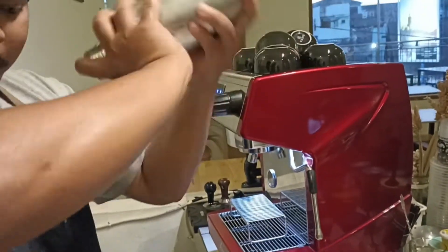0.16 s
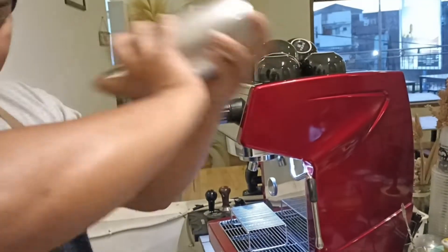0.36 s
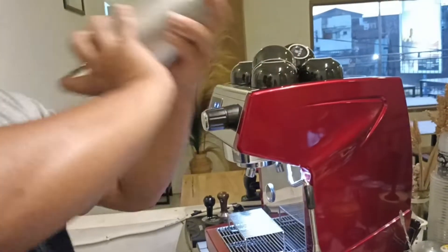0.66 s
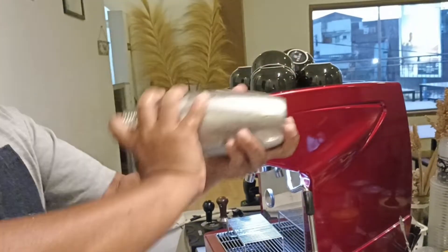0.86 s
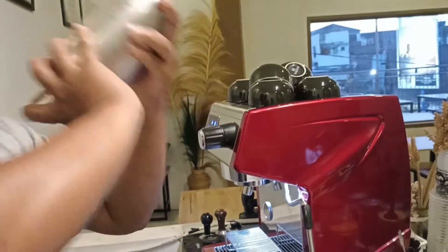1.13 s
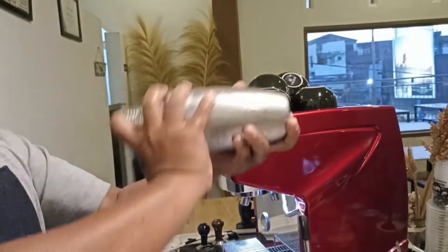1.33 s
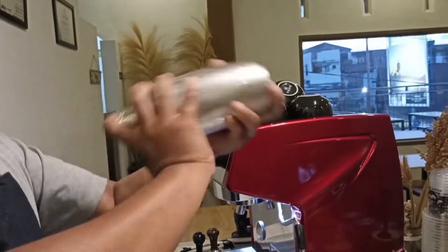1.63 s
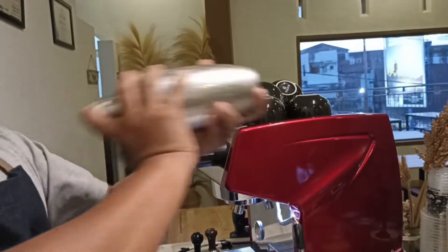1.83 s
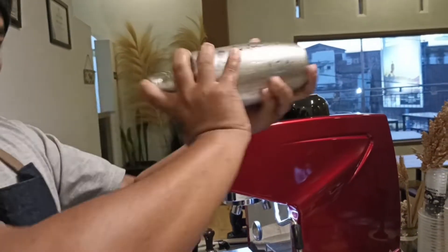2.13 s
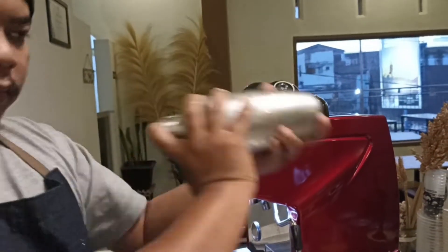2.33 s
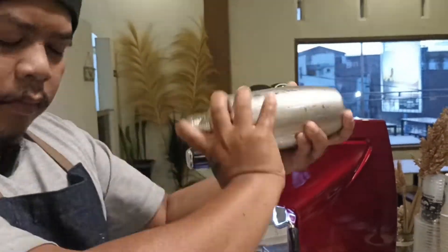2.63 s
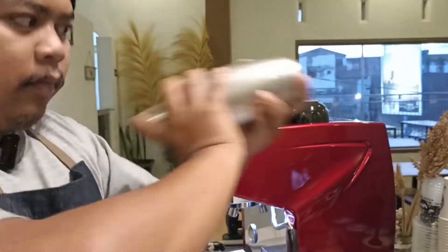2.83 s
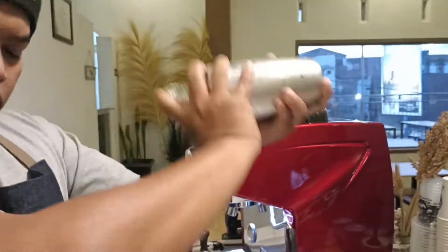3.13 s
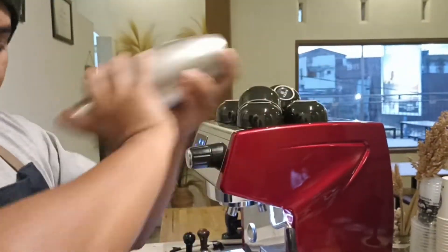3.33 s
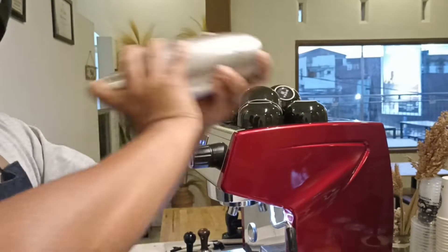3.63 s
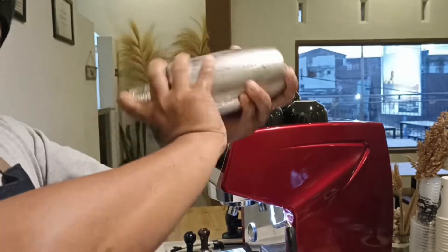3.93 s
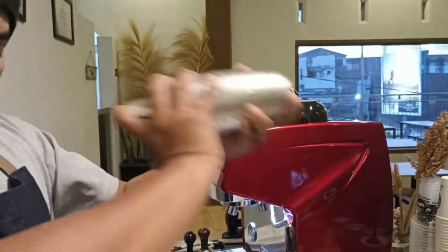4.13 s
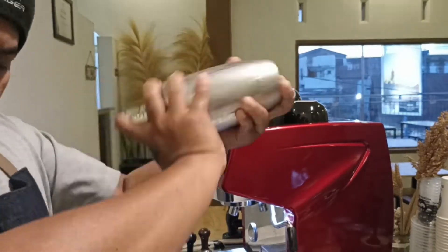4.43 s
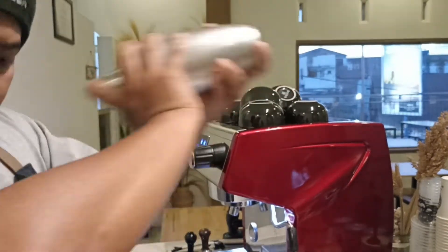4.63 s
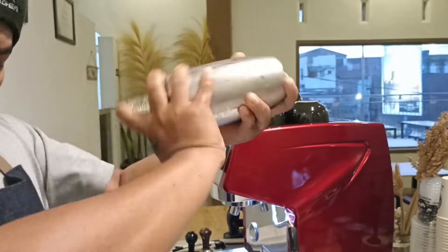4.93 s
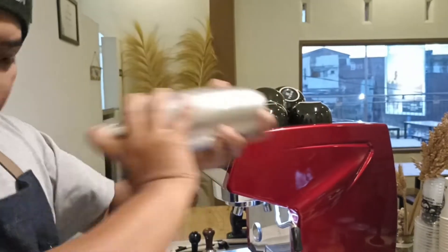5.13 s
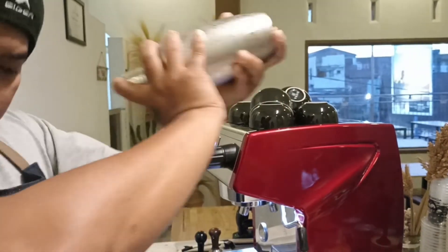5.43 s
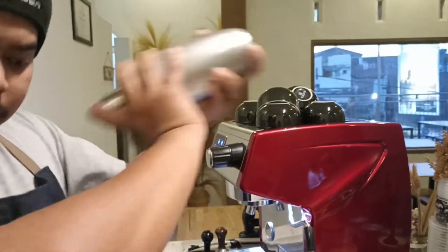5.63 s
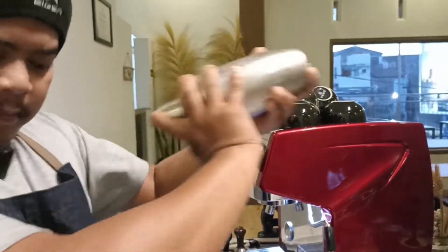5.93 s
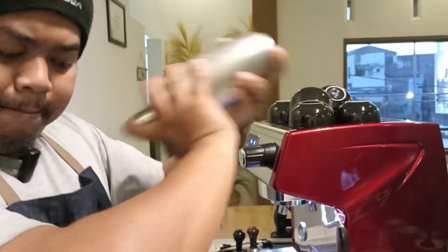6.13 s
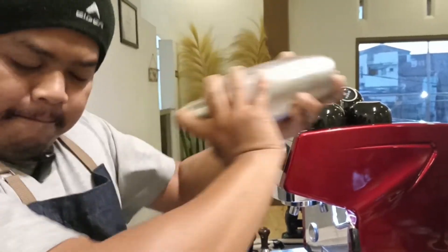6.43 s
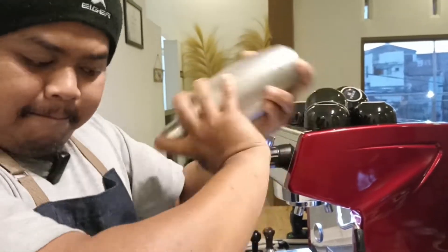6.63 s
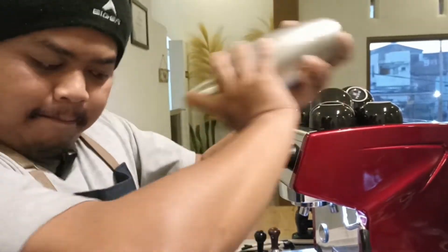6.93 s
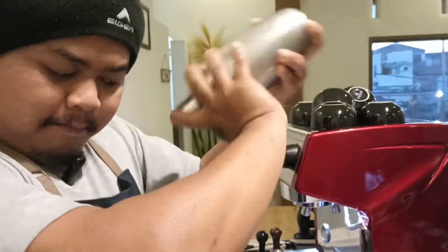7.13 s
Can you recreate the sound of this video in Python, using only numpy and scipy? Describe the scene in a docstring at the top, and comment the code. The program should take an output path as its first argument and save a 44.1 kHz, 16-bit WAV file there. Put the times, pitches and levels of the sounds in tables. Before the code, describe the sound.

Close up in a quiet cafe, a metal shaker rattles in a quick, steady back-and-forth rhythm. The first strokes carry a grainy hiss as ice clatters against the steel and the drink slaps and sloshes. The grip shifts with a tiny break, then the shaking continues with a higher, thinner ring. Sharp single clinks stand out, and the rattle grows a little softer toward the end, over faint low thuds.

```python
"""Ice cubes and liquid in a steel cocktail shaker, shaken hard about six times a second, close up in a cafe.
The load crashes into the base and the cap in turn: a wave slaps ahead, then a shower of ice contacts
rings the steel over a splash and the tin's hollow note. The crashes loosen as the cubes break up.
After a short hitch at 1.2 s the shaker is held lower and rings with another colour.
Soft bumps from the arms and the quiet air of the room lie underneath."""
import sys
import numpy as np
from scipy import signal
from scipy.fft import rfft, irfft, next_fast_len
from scipy.io import wavfile
from scipy.ndimage import uniform_filter1d, minimum_filter1d

SR = 44100
rng = np.random.default_rng(int(sys.argv[2]) if len(sys.argv) > 2 else 0)


def write(x):
    x = np.atleast_2d(x).T
    wavfile.write(sys.argv[1], SR, np.round(np.clip(x, -1, 1) * 32767).astype(np.int16))


N = 320607
TIME = np.arange(N) / SR
REGRIP_S = 1.22  # the grip moves from high to low

# crashes into each end: t/s, bright ice ring/dB, low wall clank/dB, splash/dB, hollow note/dB
BASE_CRASHES = [(0.06, -11.5, -21, -32.5, -40), (0.217, -16, -19.5, -35, -30),
                (0.366, -12.5, -18.5, -28.5, -25), (0.528, -13.5, -17.5, -34, -40),
                (0.683, -12.5, -22, -38.5, -29), (0.831, -12.5, -16, -38, -24),
                (0.993, -16.5, -32, -34, -21), (1.14, -24.5, -28.5, -36, -28),
                (1.314, -15, -22.5, -32, -19), (1.453, -14, -22, -41, -38), (1.622, -15, -30.5, -33, -39),
                (1.777, -17, -34, -51, -35), (1.928, -10, -31, -40.5, -29.5), (2.087, -9, -39, -37.5, -51),
                (2.252, -10, -23.5, -41, -50), (2.412, -9, -25, -32, -49), (2.585, -8.5, -29.5, -43.5, -56),
                (2.748, -11, -27.5, -42, -39), (2.911, -14, -31, -35.5, -37.5),
                (3.082, -10.5, -27.5, -32.5, -33), (3.247, -14, -24.5, -37.5, -39),
                (3.415, -13.5, -20, -35.5, -26), (3.569, -19, -28.5, -28, -35),
                (3.726, -14.5, -24, -31, -22), (3.895, -18.5, -29.5, -32.5, -47),
                (4.055, -18, -21, -33, -30.5), (4.224, -19.5, -28, -34.5, -37),
                (4.391, -19, -23.5, -38, -28.5), (4.56, -19, -24, -37, -35.5),
                (4.724, -19, -25, -40, -35.5), (4.887, -14, -22.5, -35, -31), (5.059, -17, -27, -38.5, -33),
                (5.223, -17, -30, -41, -41), (5.384, -16.5, -29.5, -36.5, -46), (5.548, -20, -25, -40, -41),
                (5.702, -24.5, -27, -39.5, -24.5), (5.879, -18, -29, -37, -38.5),
                (6.036, -25.5, -25, -33, -37), (6.205, -15.5, -31.5, -44, -41),
                (6.366, -16, -30.5, -39, -35.5), (6.522, -20.5, -28.5, -39.5, -40),
                (6.695, -16, -32, -42, -38), (6.849, -26, -34, -43, -41), (7.014, -16, -27.5, -41, -41.5),
                (7.183, -24, -26.5, -39, -35.5)]
CAP_CRASHES = [(0.015, -22, -24, -37, -36), (0.137, -20, -22, -33, -36), (0.282, -17, -24.5, -40, -40),
               (0.443, -13.5, -21, -27, -19.5), (0.6, -18.5, -24.5, -31.5, -35),
               (0.757, -19.5, -23, -38, -27), (0.911, -19.5, -31.5, -33.5, -38),
               (1.068, -14.5, -29.5, -33, -23), (1.226, -46, -48, -52, -52), (1.369, -16.5, -25, -37, -19),
               (1.534, -25, -28.5, -36, -30), (1.694, -32, -28, -40, -30.5), (1.846, -15, -22, -31.5, -29),
               (2.004, -21, -28, -44, -33), (2.179, -19, -30.5, -31.5, -40), (2.322, -20, -26.5, -41, -52),
               (2.504, -18.5, -27, -48, -28), (2.662, -19.5, -28.5, -35.5, -60),
               (2.825, -22.5, -27.5, -40, -56), (2.994, -19, -29, -34.5, -40),
               (3.143, -25, -32, -34.5, -52), (3.312, -19, -25, -33, -42), (3.476, -26, -29, -36, -39),
               (3.634, -28, -32, -34.5, -37), (3.8, -32.5, -31, -33.5, -54),
               (3.955, -27.5, -23, -32.5, -53), (4.11, -28, -30.5, -41, -50),
               (4.304, -26.5, -26.5, -40, -47), (4.457, -31.5, -28, -39, -41), (4.631, -31, -35, -45, -45),
               (4.761, -24, -29, -50, -41), (4.957, -30, -31, -44, -50), (5.129, -28, -30, -32, -53),
               (5.291, -33, -34.5, -36, -46), (5.448, -29, -35, -39, -52), (5.606, -26, -29, -42, -43),
               (5.76, -26.5, -29.5, -43, -45), (5.941, -30, -34, -38, -48), (6.09, -27.5, -33, -35.5, -35),
               (6.255, -25, -32, -47, -41), (6.41, -22.5, -27, -40, -38), (6.582, -30, -31.5, -43, -59),
               (6.758, -29, -35, -44, -40), (6.916, -33.5, -36, -43, -48), (7.086, -37, -40, -42.5, -55),
               (7.241, -28.5, -32.5, -42, -46)]
# colour of the steel cap: f/Hz, level/dB
CAP_COLOUR = [(2600, -8), (3000, -5), (3550, -3), (4100, -1), (4700, 5), (5350, 5), (6200, -6.5),
              (7400, -1), (8300, 3), (9600, 3), (11000, 1.5), (12200, 3.5), (14500, 4.5), (15400, -4)]


def ice():
    """Showers of small contacts ring the steel at both ends, with single hard hits standing out."""
    # the hardest single cubes: t/s, level/dB, low clank re the hit/dB
    hard_hits = [(0.05, -5, -5), (0.124, -8, -12), (0.196, -15, 2), (0.355, -8, -14), (0.4445, -12, 4),
                 (0.5404, -4, -4.5), (0.5857, -8, -8), (0.75, -13, -14), (0.8105, -12.5, 5),
                 (0.823, -9, -1), (0.9914, -3, -15), (1.059, -8, -16), (1.2915, -13, -14),
                 (1.388, -17, -12), (1.4402, -13, 0), (1.627, -1, -18), (1.7714, -4, -17),
                 (2.1687, -10, -13), (2.3964, -1, -30), (2.414, 8, -17), (2.5662, 0, -38),
                 (2.7124, -9, -29), (2.728, -17, -20), (2.8157, -14, -19), (2.8874, -9, -16),
                 (2.97, -13.5, -5), (3.076, 4, -21), (3.2166, -23, 2.5), (3.253, -1, -17),
                 (3.2926, -9, -6.5), (3.386, -18, -16), (3.557, -6, -11), (3.926, -17, 3),
                 (4.3959, -2, -10.5), (4.5205, -16.5, -1), (4.7215, 3.5, -32), (4.857, -20, 8.5),
                 (5.377, -10, -16), (5.52, -17.5, 3.5), (6.0073, -26.5, 8), (6.644, -13, -10),
                 (6.817, -15, -3.5)]
    # top treble over the steel ring at each end: t/s, level/dB
    base_sizzle = [(0, 4), (.83, 3), (1.0, 16), (1.32, -1), (1.62, 0), (2.09, 10), (2.42, 2.5), (2.75, 6),
                   (3.09, -1.5), (3.5, -6), (4.05, 3), (4.73, -2), (5.06, 3.5), (5.3, -0.5), (6.2, 4.5),
                   (6.5, 13), (7.18, 2)]
    cap_sizzle = [(0, 2), (.6, 7), (.76, -3), (.95, 13), (1.4, 15), (2.17, 15), (2.82, 10), (3.02, 0.5),
                  (3.45, 3), (3.96, -2), (4.25, 16), (4.77, -1), (5.0, 7.5), (5.6, -1), (6.1, 13),
                  (7.25, 6)]
    # colour of the base in the low grip, before and after foam builds up: f/Hz, level/dB
    base_fresh = [(2600, -19), (2900, -34), (3550, -12), (4100, -12.5), (4600, -27), (5400, -14.5),
                  (6200, -13), (7700, -18), (8700, -5), (9600, 4.5), (10600, -1), (11400, -2.5),
                  (12200, -11), (12900, -9), (14000, 2), (14800, 0), (15400, -15)]
    base_foamy = [(2600, -20.5), (2900, -24), (3550, -13), (4100, -13), (4600, -13.5), (5400, -15),
                  (6200, -15.5), (7700, -14.5), (8700, -8.5), (9500, 6), (10300, -3), (11200, -12.5),
                  (12900, -11), (14000, -1), (14800, 2), (15400, -20)]
    bands_hz = [(2700, 8000), (8000, 11500), (11500, 20000)]  # clank, ring, sizzle
    cube_gains = amp([-1, 6, -2]) ** 2  # whole cubes on the base favour the ring
    foam = np.clip((TIME - 2.1) / 0.78, 0, 1)  # narrows and sinks the base's ring
    contacts = random_times(per_s=620)
    tick = burst(attack_s=0.00016, decay_s=0.00017, tail_db=-12.5, tail_s=0.0029)
    clack = burst(attack_s=0.00062, decay_s=0.00033, tail_db=-19, tail_s=0.0025)
    base = end_powers(BASE_CRASHES, base_sizzle, clack, rise_s=0.0085, fall_s=0.0088, cube_count=3)
    cap = end_powers(CAP_CRASHES, cap_sizzle, clack, rise_s=0.0091, fall_s=0.012, cube_count=2)
    hit_s, hit_db, clank_db = np.transpose(hard_hits)
    hit_clank = impulses(hit_s, amp(hit_db + clank_db) ** 2)
    hit_ring = impulses(hit_s, amp(hit_db) ** 2)
    hits = band_powers(hit_clank, hit_ring, base_sizzle)
    out = np.zeros(N)
    for band, edges_hz in enumerate(bands_hz):
        base_swell, base_cubes = base[band]
        cap_swell, cap_cubes = cap[band]
        grain = shower(contacts, tick, scatter_db=7, even_s=0.021)
        at_base = grain * base_swell + cube_gains[band] * base_cubes + convolve(hits[band], clack)
        out += steel(at_base * (1 - foam), base_fresh, *edges_hz)
        out += steel(at_base * foam, base_foamy, *edges_hz)
        out += steel(grain * cap_swell + cap_cubes, CAP_COLOUR, *edges_hz)
    return out


def end_powers(crashes, sizzle, clack, rise_s, fall_s, cube_count):
    """Power at one end, band by band: the swell of the showers and the whole cubes landing in them."""
    crash_s, ring_db, clank_db = np.transpose(crashes)[:3]
    clank_swell = crash_power(crash_s, clank_db, rise_s, fall_s)
    ring_swell = crash_power(crash_s, ring_db, rise_s, fall_s)
    swells = band_powers(clank_swell, ring_swell, sizzle)
    cubes = strays(crash_s, ring_db - 1, spread_s=0.00737, spread_db=1.8, count=cube_count)
    clank_ratio = amp(np.interp(TIME, crash_s, clank_db - ring_db)) ** 2
    cube_bands = band_powers(cubes * clank_ratio, cubes, sizzle)
    return [(swell, convolve(hits, clack)) for swell, hits in zip(swells, cube_bands)]


def band_powers(clank, bright, sizzle):
    """Power in the low, middle and top steel modes; the sizzle splits the bright part in two."""
    ratio = amp(curve(sizzle)) ** 2
    return clank, bright / (1 + ratio), bright * ratio / (1 + ratio)


def crash_power(times, level_db, rise_s, fall_s):
    """Each crash swells as the load arrives and thins as it settles, more slowly as the cubes break up."""
    loosening_per_s, steepness = 0.13, 1.736
    power = np.zeros(N)
    for s, db in zip(times, level_db):
        near = slice(max(int(s * SR) - SR // 5, 0), int(s * SR) + SR // 5)
        t = (TIME[near] - s) / (1 + loosening_per_s * s)
        from_peak = t / np.where(t < 0, rise_s, fall_s)
        power[near] += amp(db) ** 2 * np.exp(steepness * (1 - np.hypot(1, from_peak)))
    return power


def steel(power, low_grip, lo_hz, hi_hz):
    """Contacts excite one band of the shaker's modes."""
    # colour of both ends in the high grip: f/Hz, level/dB
    high_grip = [(2600, -15), (2900, -26), (3400, -6.5), (4000, -4.5), (4600, -13), (5300, -4), (5850, 5.5),
                 (6700, -1), (7300, 0), (8400, -1), (9600, -3), (11000, -10.5), (12100, -7), (13600, -3.5),
                 (15400, -21)]
    return gripped(contact_noise(power, patchy_db=4), high_grip, low_grip, lo_hz, hi_hz)


def gripped(drive, high_grip, low_grip, lo_hz=1, hi_hz=SR):
    """The way the shaker is held sets its colour."""
    held_high = TIME < REGRIP_S
    before = convolve(drive * held_high, body(high_grip, lo_hz, hi_hz))
    after = convolve(drive * ~held_high, body(low_grip, lo_hz, hi_hz))
    return before + after


def clinks():
    """Cubes that chatter on one spot of the wall bring out a single steel mode."""
    # chattering cubes: t/s, f/Hz, level/dB
    chatters = [(0.591, 8010, -30), (0.746, 8350, -18), (0.986, 8010, -24), (1.056, 8310, -18.5),
                (1.439, 4130, -27), (1.844, 5170, -18.5), (2.169, 5380, -28), (2.311, 4780, -25.5),
                (2.496, 5340, -22.5), (2.652, 4870, -26), (2.999, 4910, -27), (3.229, 3490, -27.5),
                (3.239, 8700, -19), (3.564, 8790, -21), (3.71, 4090, -40), (3.923, 4680, -24.5),
                (4.216, 6590, -23), (4.296, 4780, -27.5), (4.452, 4650, -29), (4.546, 4090, -25)]
    return rough_notes(chatters, swell_s=0.0083, width_hz=260, glide=0)


def singing_wall():
    """Countless small touches keep a few lightly damped wall modes ringing; the grip decides which."""
    # the ring between crashes, until foam damps it: t/s, level/dB
    ring_level = [(0, -45), (.45, -38), (.65, -28), (1.15, -34.5), (1.24, -49), (1.35, -43), (1.9, -27.5),
                  (2.3, -30.5), (2.7, -66), (3.3, -38), (4, -40), (7.27, -56)]
    # long wall modes in each grip: f/Hz, width/Hz, level/dB
    high_grip = [(3920, 400, -22), (6100, 250, -10), (6660, 210, 6), (8320, 290, 11), (12500, 400, -9)]
    low_grip = [(3570, 220, -2.5), (5300, 790, -3.5), (12500, 440, 8)]
    t = np.arange(SR // 40) / SR
    touch = burst(attack_s=0.00014, decay_s=0.00071, tail_db=-51, tail_s=0.0035)
    touches = np.sqrt(shower(random_times(per_s=590), touch, scatter_db=2.5, even_s=0.1))
    out = np.zeros(N)
    for modes, held in ((high_grip, TIME < REGRIP_S), (low_grip, TIME >= REGRIP_S)):
        ring = np.zeros(len(t))
        for hz, width_hz, db in modes:
            envelope = width_hz ** 1.5 * t * np.exp(-1.5 * np.pi * width_hz * t)
            ring += amp(db) * envelope * np.sin(2 * np.pi * hz * t)
        out += convolve(held * touches * rng.standard_normal(N), ring / np.linalg.norm(ring))
    return amp(curve(ring_level)) * out


def swirling_chips():
    """Between the crashes, small chips keep ticking along the wall."""
    chip = burst(attack_s=0.0001, decay_s=0.00036, tail_db=-18, tail_s=0.0052)
    grain = shower(random_times(per_s=420), chip, scatter_db=3.8, even_s=0.04)
    level_db = -41 - 3.5 * swing(lag_s=0.0099)
    return amp(level_db) * convolve(contact_noise(grain, patchy_db=1), body(CAP_COLOUR, lo_hz=2700))


def shards():
    """Broken-off pieces click on the wall one by one, dry and broad."""
    # strength of the clicks: t/s, level/dB
    click_level = [(0, -21), (.55, -28), (1.2, -47), (1.6, -37), (3.0, -25.5), (4.0, -28), (5.5, -22),
                   (7.27, -27.5)]
    times = random_times(per_s=45)
    size_db = 4.4 * np.clip(rng.standard_normal(len(times)), -2, 1.5)
    click = burst(attack_s=0.00044, decay_s=0.00079, tail_db=-29, tail_s=0.003)
    power = amp(curve(click_level)) ** 2 * convolve(impulses(times, amp(size_db) ** 2), click)
    wall = body([(250, -16.5), (500, -4.5), (1400, -4.5), (2900, -5),
                 (4200, 1), (6500, -3), (9500, 1), (15000, -3.5)])
    return convolve(contact_noise(power, patchy_db=2.5), wall)


def hollow_tin():
    """The rattling keeps the tin's hollow resonance sounding; it flares just after each crash."""
    # the hollow note between crashes: t/s, level/dB
    bed_level = [(0, -35), (.3, -34.5), (.55, -27.5), (.72, -25.5), (1.05, -27.5), (1.35, -37.5),
                 (1.6, -40), (1.95, -36), (2.3, -43.5), (2.7, -52), (3.4, -45), (4.0, -48), (7.27, -50)]
    # its colour in each grip: f/Hz, level/dB
    high_grip = [(900, -43), (1330, -13), (1520, -13), (1730, -3.5), (1950, -22), (2150, 3.5), (2300, 8),
                 (2420, -1), (2550, -20), (2800, -24), (3600, -35)]
    low_grip = [(1500, -42), (1800, -18), (2000, -5), (2170, 6.5), (2330, 9.5), (2430, -2), (2560, -20),
                (2900, -73), (3600, -41.5)]
    crash_s, *_, hollow_db = np.vstack([BASE_CRASHES, CAP_CRASHES]).T
    bed = amp(curve(bed_level) + swing(lag_s=0.013)) ** 2
    flares = crash_power(crash_s + 0.0052, hollow_db, rise_s=0.0084, fall_s=0.009)
    knock = burst(attack_s=0.00026, decay_s=0.0044, tail_db=-2, tail_s=0.004)
    grain = shower(random_times(per_s=570), knock, scatter_db=4.5, even_s=0.016)
    return gripped(contact_noise((bed + flares) * grain, patchy_db=1, frame=512), high_grip, low_grip)


def liquid():
    """A wave slaps the wall ahead of every crash, then the drink splashes with the ice."""
    # the loudest slaps on the wall: t/s, level/dB
    big_slaps = [(0.13, -22.5), (0.2876, -22.5), (0.3578, -17), (0.528, -27), (0.5847, -25.5),
                 (0.7499, -24.5), (0.9056, -21), (1.1314, -22), (1.3585, -21.5), (1.3876, -19),
                 (1.677, -19.5), (1.827, -34), (1.98, -26), (2.1485, -19), (2.655, -27), (2.8162, -24),
                 (3.4837, -24), (3.587, -18.5), (3.665, -23.5), (3.942, -33), (4.289, -29), (4.6183, -28),
                 (4.7687, -23), (5.0236, -26.5), (5.519, -25), (5.762, -24), (5.924, -25), (6.027, -28),
                 (6.4335, -20), (6.906, -25)]
    # colour of the sloshing drink: f/Hz, level/dB
    colour = [(71, -48), (120, -30), (150, -25), (280, -8.5), (487, 1), (581, -1.5), (638, 0.5), (685, 0),
              (953, -2), (1050, -2.5), (1360, -4), (1490, -8), (2000, -6), (2600, -8), (4400, -120)]
    wave_lead_s = 0.018
    crash_s, _, _, splash_db, _ = np.vstack([BASE_CRASHES, CAP_CRASHES]).T
    slap_s, slap_db = np.transpose(big_slaps)
    drop = burst(attack_s=0.00026, decay_s=0.00095, tail_db=-6.5, tail_s=0.0032)
    drops = shower(random_times(per_s=300), drop, scatter_db=6.5, even_s=0.015)
    splash = drops * (crash_power(crash_s, splash_db, rise_s=0.0067, fall_s=0.0056) + amp(-45.5) ** 2)
    waves = strays(crash_s - wave_lead_s, splash_db + 3, spread_s=0.006, spread_db=1.5, count=1)
    waves += impulses(slap_s, amp(slap_db) ** 2)
    slaps = convolve(waves, burst(attack_s=0.00037, decay_s=0.00032, tail_db=-20.5, tail_s=0.011))
    return convolve(contact_noise(splash + slaps, patchy_db=2.5), body(colour))


def gulps():
    """Trapped air rings low and rises a little as the pocket closes."""
    # air pockets in the drink: t/s, f/Hz, level/dB
    pockets = [(0.361, 943, -28), (0.521, 1340, -26), (0.579, 1370, -25.5), (0.591, 655, -32),
               (1.842, 729, -30.5), (1.997, 560, -32.5), (2.145, 572, -31.5), (2.169, 1357, -28.5),
               (2.241, 489, -31), (3.083, 470, -33.5), (3.566, 630, -25.5), (3.955, 540, -30.5),
               (6.034, 484, -31)]
    return rough_notes(pockets, swell_s=0.0064, width_hz=133, glide=0.54)


def opening_hiss():
    """A broad, grainy hiss pulses with the opening strokes and fades by 0.9 s."""
    # fade of the hiss: t/s, level/dB
    hiss_level = [(0, -24.5), (.2, -23.5), (.45, -26), (.6, -35), (.78, -41), (.9, -60), (1.2, -70)]
    # its broad colour: f/Hz, level/dB
    colour = [(300, -43), (700, -11), (1000, -3.5), (1350, -1), (1550, -6), (1850, -3), (2100, 2.5),
              (2800, -7.5), (3600, -4.5), (5000, 2), (6500, -9), (11000, -1), (15000, -11)]
    level_db = curve(hiss_level) + 2.5 * swing(lag_s=0.004)
    tick = burst(attack_s=0.00013, decay_s=0.00043, tail_db=-14.5, tail_s=0.0042)
    grain = shower(random_times(per_s=490), tick, scatter_db=2, even_s=0.028)
    return amp(level_db) * convolve(contact_noise(grain, patchy_db=3.5), body(colour))


def arm_bumps():
    """Soft low pushes as the shaker is stopped and thrown back, just before each crash into the base."""
    # how hard the arms stop the shaker: t/s, level/dB
    stop_level = [(0, -64), (1.1, -62), (1.3, -50.5), (1.8, -58), (2.4, -46.5), (3.2, -43), (4.55, -42),
                  (5.0, -52), (5.7, -58), (6.05, -44), (6.7, -46.5), (6.9, -60)]
    stop_s = np.transpose(BASE_CRASHES)[0] - 0.025
    stops = impulses(stop_s, amp(curve(stop_level, at=stop_s)) ** 2)
    power = convolve(stops, burst(attack_s=0.0097, decay_s=0.011, tail_db=-22, tail_s=0.033))
    thud = body([(20, -7.0), (55, 2.5), (110, -6.5), (220, -8.5), (500, -24), (1500, -84)])
    return np.sqrt(np.abs(power)) * unit(convolve(rng.standard_normal(N), thud))


def room_reverb(x):
    """A short diffuse answer of the walls, 5 ms late; the mids ring longest."""
    # decay of the room: f/Hz, t60/s
    decay = [(200, 0.054), (2000, 0.21), (8000, 0.13), (15000, 0.19)]
    hz, t, spectra = signal.stft(rng.standard_normal(SR // 2), SR, nperseg=256)
    fade = amp(-60 * t / along(decay, hz)[:, None])
    tail = signal.istft(spectra * fade, SR, nperseg=256)[1]
    return convolve(x, np.pad(tail / np.linalg.norm(tail), (SR // 200, 0)))


def cafe_air():
    """The quiet steady air of the room."""
    # room tone: f/Hz, level/dB
    colour = [(25, -9), (55, -12), (90, 2), (200, -0.5), (500, -12), (1500, 8), (4000, 2), (15000, -32)]
    return amp(-50) * unit(convolve(rng.standard_normal(N), body(colour)))


def rough_notes(rows, swell_s, width_hz, glide):
    """Short rough notes: one resonance is struck again and again, swells and dies."""
    t = np.arange(SR // 10) / SR
    envelope = t / swell_s * np.exp(1 - t / swell_s)
    pole = np.exp(-np.pi * width_hz / SR)
    out = np.zeros(N + len(t))
    for (s, hz, db), kicks in zip(rows, rng.standard_normal((len(rows), 2, len(t)))):
        flutter = signal.lfilter([1], np.poly([pole, pole]), kicks[0] + 1j * kicks[1])
        note = envelope * np.real(flutter * np.exp(2j * np.pi * hz * t * (1 + glide * t)))
        out[round(s * SR):][:len(t)] += amp(db) * note * np.linalg.norm(envelope) / np.linalg.norm(note)
    return out[:N]


def swing(lag_s):
    """The beat of the shaking: 1 just after each crash, -1 while the load is in flight."""
    crash_s = np.sort(np.vstack([BASE_CRASHES, CAP_CRASHES])[:, 0])
    return np.cos(2 * np.pi * np.interp(TIME - lag_s, crash_s, np.arange(len(crash_s))))


def burst(attack_s, decay_s, tail_db, tail_s):
    """Power of one contact over time, peak 1: a quick burst and a tail."""
    t = np.arange(SR // 8) / SR
    onset = (1 - np.exp(-t / attack_s)) ** 2
    power = onset * (np.exp(-t / decay_s) + amp(tail_db) ** 2 * np.exp(-t / tail_s))
    return power / power.max()


def shower(times, shape, scatter_db, even_s):
    """Power of many contacts of random size, evened to a local mean of 1."""
    sizes = amp(scatter_db * rng.standard_normal(len(times))) ** 2
    power = np.abs(convolve(impulses(times, sizes), shape))
    local_mean = np.abs(uniform_filter1d(power, max(int(even_s * SR), 1)))
    return power / (local_mean + 1e-6)


def strays(times, level_db, spread_s, spread_db, count):
    """Power of a few single contacts scattered around each given time."""
    when, size = rng.standard_normal((len(times), 2, count)).transpose(1, 2, 0)
    return impulses((times + spread_s * when).ravel(), amp(level_db + spread_db * size).ravel() ** 2)


def contact_noise(power, patchy_db, frame=256):
    """Noise of the given power whose colour keeps shifting, as cubes land on new spots."""
    spectra = signal.stft(rng.standard_normal(N), nperseg=frame)[2]
    patches = uniform_filter1d(rng.standard_normal(spectra.shape), size=4, axis=0)
    patches = uniform_filter1d(patches, size=12, axis=1)
    noise = signal.istft(spectra * amp(patchy_db * unit(patches)), nperseg=frame)[1][:N]
    return np.sqrt(np.abs(power)) * unit(noise)


def body(colour, lo_hz=1, hi_hz=SR, size=4096, order=24):
    """Impulse response of energy 1 with a colour (f/Hz, level/dB) between two band edges."""
    hz = np.fft.rfftfreq(size, 1 / SR) + 1
    gain = amp(along(colour, hz)) / np.sqrt((1 + (lo_hz / hz) ** order) * (1 + (hz / hi_hz) ** order))
    cepstrum = irfft(np.log(np.maximum(gain, 1e-5)))
    cepstrum[1:size // 2] *= 2  # minimum phase: nothing rings ahead of the hit
    cepstrum[size // 2 + 1:] = 0
    response = irfft(np.exp(rfft(cepstrum)))
    return response / np.linalg.norm(response)


def random_times(per_s):
    return TIME[rng.random(N) < per_s / SR]


def impulses(times, sizes):
    return np.bincount(np.clip(np.round(times * SR).astype(int), 0, N - 1), sizes, N)


def curve(points, at=TIME):
    """Points (t/s, value) joined by straight lines."""
    return np.interp(at, *np.transpose(points))


def along(points, hz):
    """Points (f/Hz, value) joined on a log frequency axis."""
    point_hz, values = np.transpose(points)
    return np.interp(np.log(hz + 1), np.log(point_hz + 1), values)


def convolve(x, response):
    return signal.oaconvolve(x, response)[:N]


def amp(db):
    return 10 ** (np.asarray(db) / 20)


def unit(x):
    return x / np.sqrt(np.mean(x ** 2) + 1e-20)


def scene():
    """The shaker up close with a touch of room, over the bumps and the cafe air, in mono."""
    rattle = ice() + clinks() + singing_wall() + swirling_chips() + shards() + hollow_tin()
    shaker = rattle + liquid() + gulps() + opening_hiss()
    return (shaker + amp(-14.5) * room_reverb(shaker) + arm_bumps() + cafe_air())[None]


def record(dry):
    """A fast limiter holds the hardest hits near full scale; a steep cut takes off the very top."""
    ceiling, top_hz = 0.93, 15520
    gain = minimum_filter1d(ceiling / np.maximum(np.abs(dry), ceiling), size=64)
    limited = dry * uniform_filter1d(uniform_filter1d(gain, size=32), size=32)
    size = next_fast_len(N + SR // 4)
    passband = np.fft.rfftfreq(size, 1 / SR) < top_hz
    return irfft(rfft(limited, size) * passband, size)[:, :N]


dry = scene()
out = record(dry)
write(out)
```